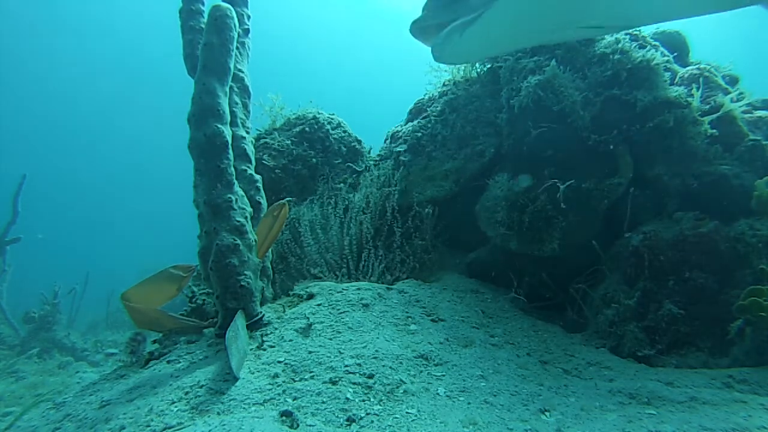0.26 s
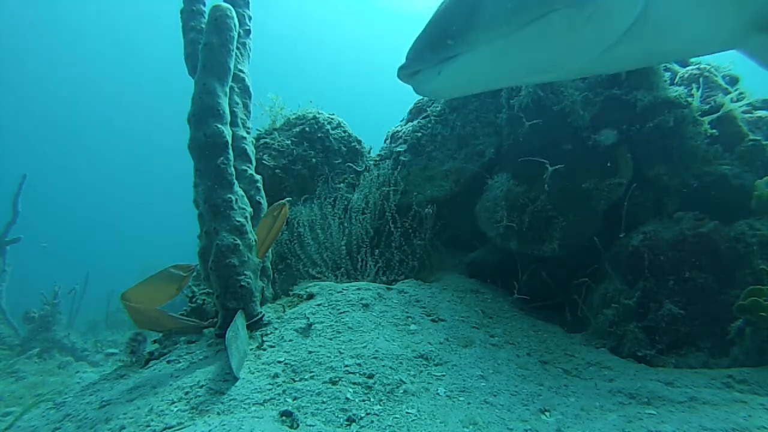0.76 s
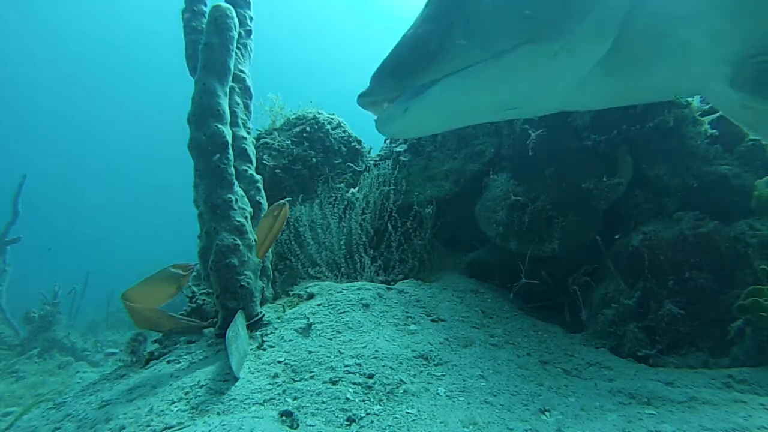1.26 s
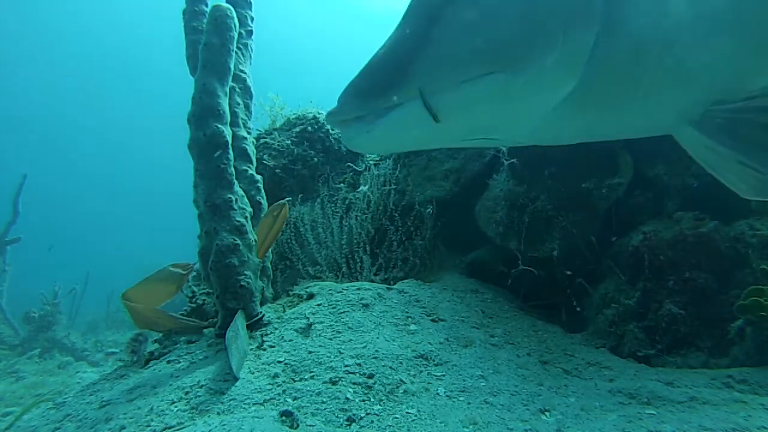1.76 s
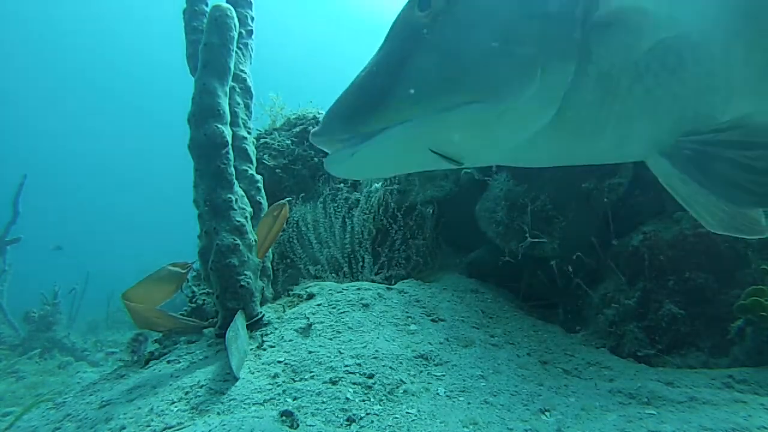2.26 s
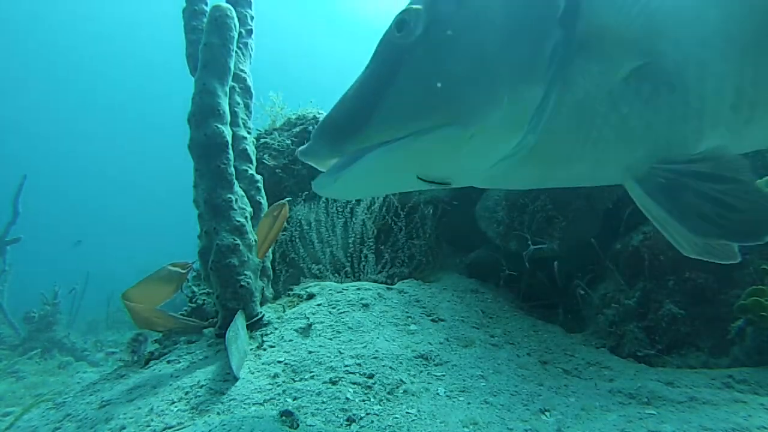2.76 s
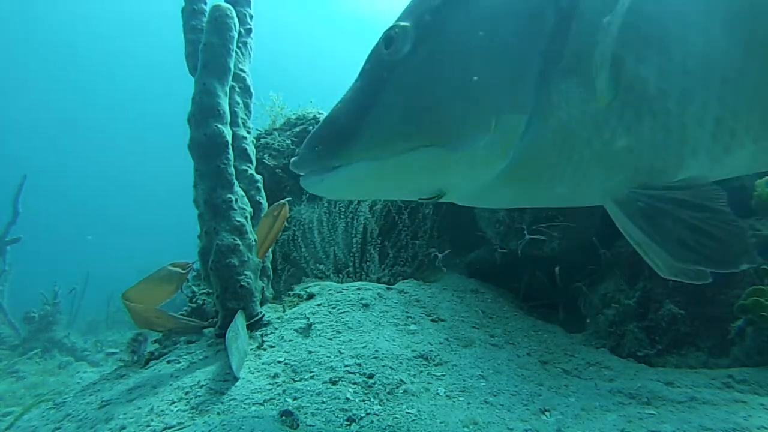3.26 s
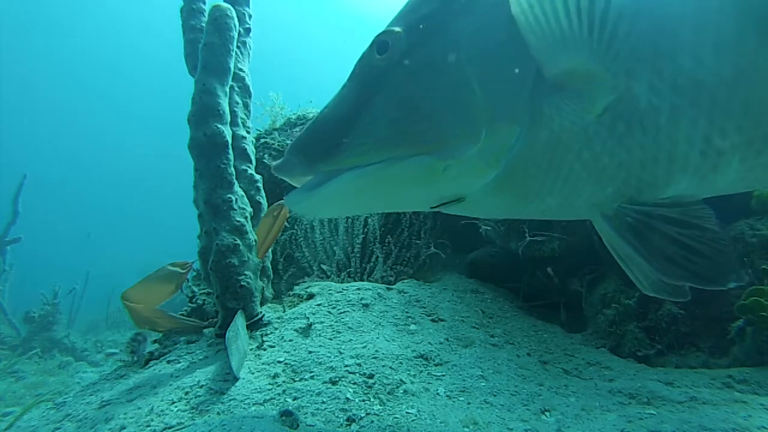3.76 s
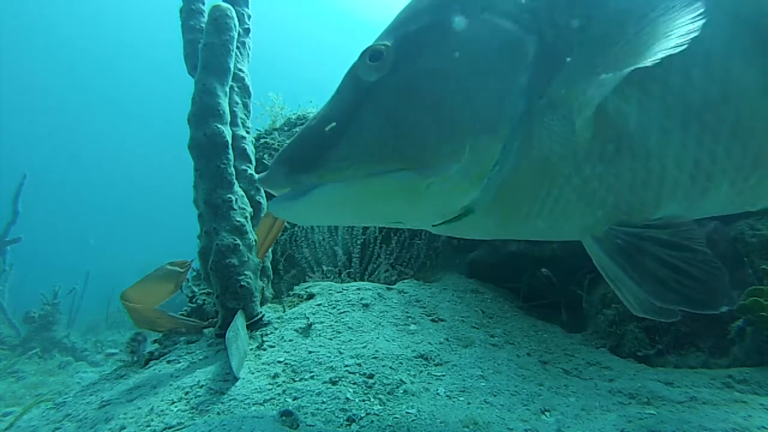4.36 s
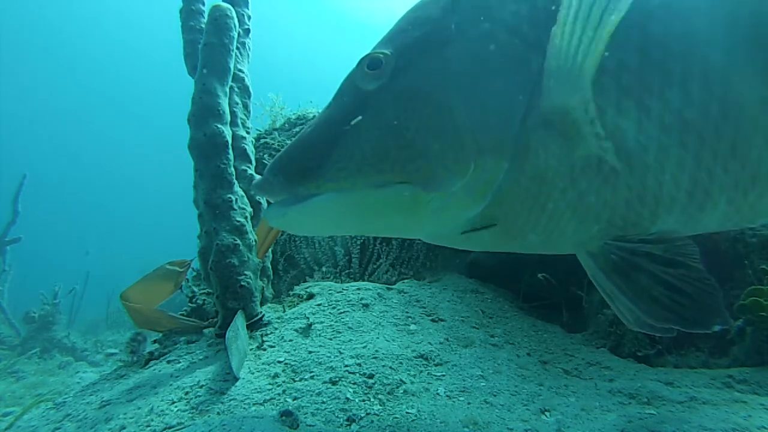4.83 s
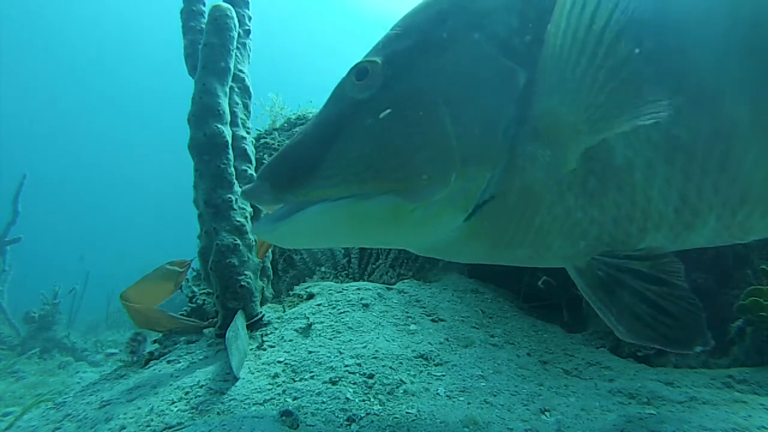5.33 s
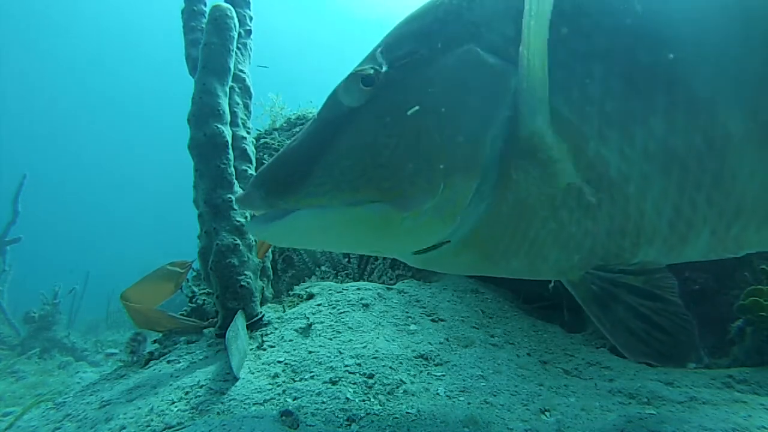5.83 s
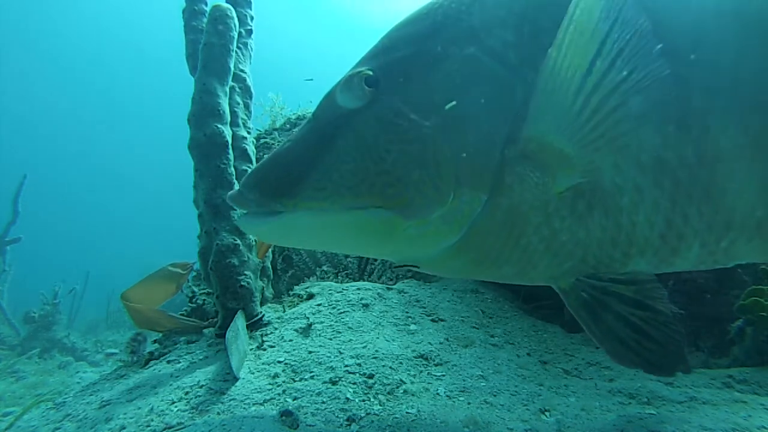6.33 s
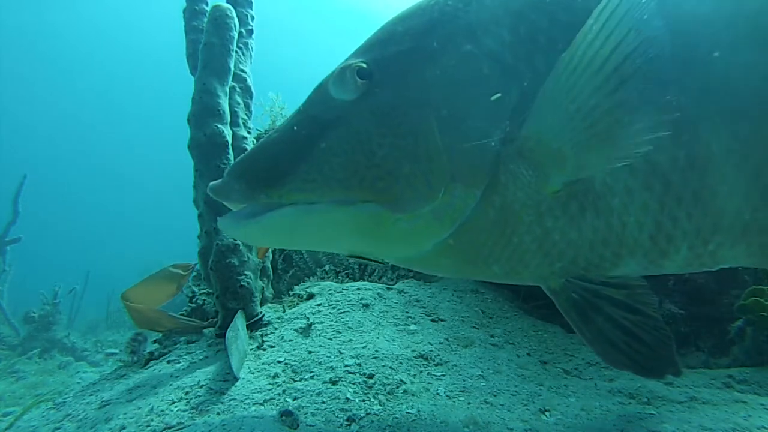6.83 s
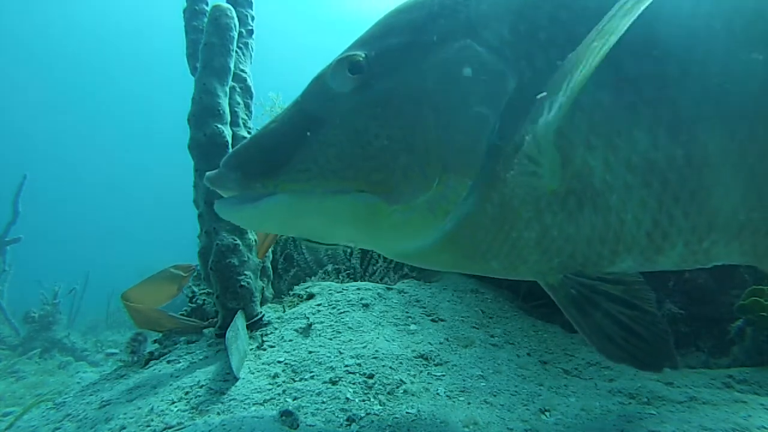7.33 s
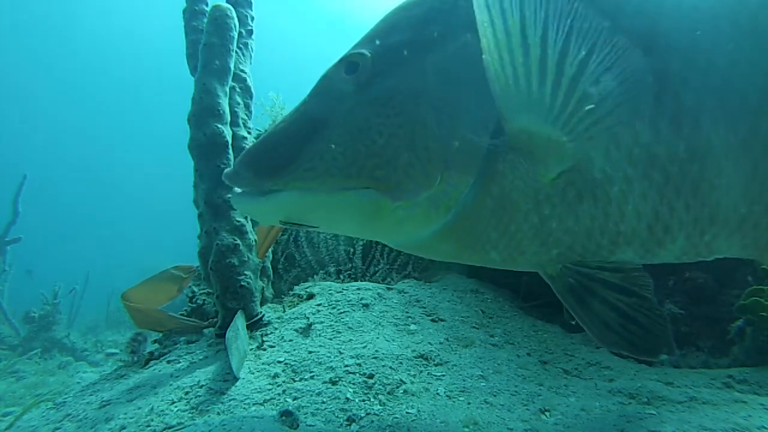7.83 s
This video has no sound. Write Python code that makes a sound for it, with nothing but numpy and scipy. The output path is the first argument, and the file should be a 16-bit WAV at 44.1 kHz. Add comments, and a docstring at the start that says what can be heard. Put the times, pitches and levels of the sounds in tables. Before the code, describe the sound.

A steady underwater crackle, like frying or crackling twigs, made of countless shrimp snaps, dull tocks to thin bright ticks, with brief reef echoes. Low sea wash and soft hiss lie beneath. An early sharp crack dominates; faint low hums rise around it. Later come small dull knocks, stronger snaps and short, faint rising toots. The sound is nearly centred, coloured by the ringing housing of the microphone.

```python
"""Inside a watertight housing on a coral reef: low sea wash, swelling rumble and hiss, all shaped noise, run throughout
under crackling snapping shrimp; every snap is a sum of decaying housing modes. Near and neighbouring snaps have a reef
echo, weaker for the closest; near ones stand out from the start, one very close at 1.0 s. Faint rising fish hums,
harmonic tones, come at 0.9-2.2 s, dull knocks, decaying sines, at 4.3 s and 6.6-6.7 s, and short fish toots, made
like the hums, from 7.2 s."""
import sys
import numpy as np
from scipy import signal
from scipy.fft import rfft, irfft, next_fast_len
from scipy.io import wavfile
from scipy.ndimage import map_coordinates

SR = 44100
rng = np.random.default_rng(int(sys.argv[2]) if len(sys.argv) > 2 else 0)


def store_wav(level_fs):
    """Save 16-bit WAV to argv[1]."""
    pcm = np.round(np.clip(np.atleast_2d(level_fs), -1, 1) * 32767)
    wavfile.write(sys.argv[1], SR, pcm.T.astype(np.int16))


N = 356769


def amp(db):
    """Level in dB to amplitude."""
    return 10 ** (np.asarray(db) / 20)


def unit(x):
    """Scale to rms 1."""
    return x / np.sqrt(np.mean(x ** 2) + 1e-20)


def along(points, hz):
    """Interpolate (frequency [Hz], value) points on a log frequency axis."""
    point_hz, value = np.transpose(points)
    return np.interp(np.log(hz + 1), np.log(point_hz + 1), value)


def wobble(knots_per_s, size):
    """Smooth random curve: a spline through normal random knots."""
    knots = rng.standard_normal(int(size * knots_per_s / SR) + 4)
    return map_coordinates(knots, [np.arange(size) * knots_per_s / SR])


def filtered(x, response):
    """Multiply the spectrum of x by a response of frequency."""
    size = next_fast_len(N + 8192)
    spectrum = rfft(x, size) * response(np.fft.rfftfreq(size, 1 / SR))
    return irfft(spectrum, size)[..., :N]


def noise(density):
    """Coloured noise of rms 1."""
    white = rng.standard_normal(N)
    return unit(filtered(white, lambda hz: amp(along(density, hz))))


def add(track, start_s, sound):
    """Mix a sound into a track, cut at the track's end."""
    part = track[max(round(start_s * SR), 0):][:len(sound)]
    part += sound[:len(part)]


def sea(wash_db=-57, haze_db=-62, rumble_rest_db=-69, rise_s=0.18, fall_s=0.33):
    """Steady wash, swelling rumble and the flickering hiss of countless far shrimp, each as shaped noise."""
    # noise colours: (frequency [Hz], relative density [dB per Hz])
    wash = [(10, -15), (22, -3), (45, 0.5), (80, -2), (160, -6), (300, -9.5), (500, -11), (900, -16.5),
            (1500, -26), (4000, -60)]
    rumble = [(60, -56), (130, 3), (190, 0), (280, -5), (450, -20), (1000, -61)]
    haze = [(400, -10), (950, 0), (1350, -3), (1570, -1), (1800, -4), (2330, -1.5), (2900, -4.5),
            (3310, -5), (4000, -9.5), (4700, -9), (6000, -9.5), (6950, -10), (9400, -15.5), (12000, -20.5),
            (13500, -21), (15000, -25.5)]
    # rumble swells: (start [s], length [s], level [dB])
    swells = [(.88, 0.77, -60), (1.7, 0.32, -57), (4.47, 0.57, -58)]
    t = np.arange(N) / SR
    swell = np.zeros(N)
    for start_s, length_s, db in swells:
        rise = (t - start_s) / rise_s
        fall = (start_s + length_s - t) / fall_s
        swell += amp(db) * np.clip(np.minimum(rise, fall), 0, 1)
    rumble_level = np.maximum(swell, amp(rumble_rest_db))
    haze_level = amp(haze_db + 0.71 * wobble(5.4, N) + 1.35 * wobble(250, N))
    return amp(wash_db) * noise(wash) + rumble_level * noise(rumble) + haze_level * noise(haze)


def side_noise(level_db=-80):
    """Faint wide noise, for use with opposite sign in left and right."""
    # (frequency [Hz], relative density [dB per Hz])
    side = [(18, -37), (30, -7), (116, -8), (167, -10.5), (364, 2), (1920, 0.5), (2310, -2), (3780, 4.5),
            (8470, -1), (15000, -33)]
    return amp(level_db) * noise(side)


def ring(low_db, treble_db, scatter_db, detune, phase_spread_rad=1.0, attack_s=0.00033, edge_hz=650):
    """One collapsing bubble rings the housing modes; its size and path tilt the spectrum and shift the peaks."""
    # housing modes: (frequency [Hz], bandwidth [Hz], relative spectral peak before tilt [dB])
    housing = [(998, 144.5, -11), (1562, 84, -8), (2368, 297, 1), (3320, 200, -2), (3544, 210, -15.5),
               (4630, 350, -8), (5670, 220, -15), (6930, 580, -8.5), (8200, 580, -19.5), (11020, 1080, -21),
               (12570, 910, -28), (14400, 1040, -38)]
    t = np.arange(SR // 50) / SR
    hz, width_hz, db = np.transpose(housing)[:, :, None]
    tilt_db = along([(950, 0.97 * low_db), (1550, low_db), (2300, 0.0037), (3400, 0), (7000, treble_db)], hz)
    mode_db = db + tilt_db + scatter_db * rng.standard_normal(hz.shape)
    size = amp(mode_db) * width_hz / width_hz.mean()  # wider modes die sooner
    pitch_hz = hz * (1 + detune * rng.standard_normal(hz.shape))
    phase = phase_spread_rad * rng.standard_normal(hz.shape)  # modes start at loosely scattered phases
    modes = size * np.exp(-np.pi * width_hz * t) * np.cos(2 * np.pi * pitch_hz * t + phase)
    onset = 1 - np.exp(-t / attack_s)
    highpass = signal.butter(3, edge_hz, "high", fs=SR, output="sos")
    return signal.sosfilt(highpass, modes.sum(0) * onset)


def colonies(snaps_per_s=130, base_db=-54, spread_db=5, range_db=15, patches=24):
    """Reef patches from dull to bright, each repeating its own snap at random; few snaps are strong."""
    out = np.zeros(N)
    for treble_db in np.linspace(-6, 20, patches):
        patch_db = base_db - 0.63 * max(treble_db, 0)  # brighter, so less body
        snap = amp(patch_db) * ring(0, treble_db, scatter_db=3, detune=0.036)
        waits, strengths = rng.exponential(size=(2, 128))
        times_s = np.cumsum(waits) * patches / snaps_per_s
        for time_s, strength in zip(times_s, strengths):
            add(out, time_s, snap * amp(min(spread_db * strength, range_db)))
    return out


def reef_echo(surface_s=0.011, surface_db=-20, t60_s=0.046, scatter_db=-10, dull_hz=4500):
    """Inverted copy from the surface plus short coral scatter, new for every place, then dulled together."""
    t = np.arange(SR // 10) / SR
    tail_db = -60 * t / t60_s + 2.03 * wobble(377, len(t))
    onset = 1 - np.exp(-t / 0.0044)
    tail = rng.standard_normal(len(t)) * amp(tail_db) * onset
    echo = amp(scatter_db) * tail / np.linalg.norm(tail)
    add(echo, surface_s * rng.uniform(0.79, 1.8), -amp([surface_db]))
    return signal.lfilter(*signal.butter(1, dull_hz, fs=SR), echo)


def snap_in_reef(db, low_db, treble_db, gain_db=15, dry_above_db=-40, drying=0.62):
    """One snap and its echo; the closer the shrimp, the less the reef colours and echoes it."""
    far = amp(-drying * max(db - dry_above_db, 0))  # 1 when far, towards 0 when close
    snap = amp(db + gain_db) * ring(low_db, treble_db, scatter_db=2.8 * far, detune=0.032 * far)
    sound = far * signal.fftconvolve(snap, reef_echo())
    add(sound, 0, snap)
    return sound


def neighbours(snaps_per_s=10, mean_db=-56, spread_db=0.7, low_spread_db=4):
    """Loose, steady patter of weaker snaps, from dull tocks to thin ticks with less body."""
    dullest_db, brightest_db = -15.5, 16.5  # treble tilt
    body_loss = 0.33  # dB of level lost per dB of brightness
    out = np.zeros(N)
    for k in range(160):
        when, bright = rng.uniform(size=2)
        size, low = rng.standard_normal(2)
        time_s = (k + 2 * when - 1) / snaps_per_s
        treble_db = dullest_db + bright * (brightest_db - dullest_db)
        db = mean_db + spread_db * size - body_loss * max(treble_db, 0)
        if 0 < time_s < N / SR:
            add(out, time_s, snap_in_reef(db, low_spread_db * low, treble_db))
    return out


def near_shrimp():
    """Single bubble snaps that stand out from the crackle."""
    # (time [s], level before the gain of snap_in_reef [dB], low tilt [dB], treble tilt [dB])
    snaps = [(0.046, -53.5, -3, 4.5), (0.4569, -48, 6, -17), (0.5067, -56.5, -3, 10),
             (0.776, -49.5, 6, -14), (0.8556, -50.5, 4, 1), (0.935, -54, 3, 17), (0.948, -53, -8, 10),
             (1.0038, -14, -2, 0.5), (1.2898, -49, 3, -0.5), (1.3588, -44.5, 2.5, -15),
             (1.4677, -50, -2, -1.5), (1.535, -50, 17, -17), (1.54, -43, 13.5, -4), (1.649, -42.5, 6, -10),
             (1.66, -50.5, -1, 10), (1.9631, -48, 2, -6), (2.16, -45.5, 3, 4), (2.2536, -48.5, 6, -18),
             (2.585, -46.5, 0, 1.5), (2.7354, -45.5, 2, -13), (2.786, -48.5, -5, 7.5),
             (3.409, -43, -1, -1.5), (3.454, -40, 2, -14), (3.462, -42.5, -11, 9.5), (3.5456, -43, -5, -14),
             (3.6163, -44.5, 0, -16), (3.811, -48.5, 4, -9), (3.852, -40, -4, -8), (3.934, -41.5, 3, -21.5),
             (3.9948, -43, 7.5, -12), (4.3406, -44, 1, 6), (4.353, -42.5, -2, 4), (4.459, -47, -1, 0),
             (4.524, -43, -4, -2), (4.6169, -51, 9, -18), (4.731, -49, -6, 5), (4.9526, -50, -9, 9.5),
             (5.2543, -46.5, 5, -3), (5.2646, -45, -6, 8.5), (5.6123, -45.5, 5, -7),
             (5.8349, -43, -3.5, -10), (5.843, -35, 1, -10), (5.8843, -53.5, 4, 11),
             (5.9255, -52.5, -11, 19.5), (5.9707, -54, 1, 11), (6.0836, -43.5, 8, -2.5),
             (6.3312, -44.5, 5.5, 0.5), (6.363, -45.5, -3, -6), (6.4938, -41, -3, 2),
             (6.5371, -35.5, 2.5, -5.5), (6.5747, -43.5, 3, -4), (6.6501, -27.5, 6, -40),
             (6.6567, -41, 8, -10), (6.67, -38, -2, 1), (6.821, -38.5, 3, -10), (6.8565, -46, 2, -12),
             (6.9409, -46.5, -3, -19), (6.9605, -44, 2, -2), (6.998, -38.5, -1.5, 0.5),
             (7.1545, -39, -7.5, -6.5), (7.2281, -45.5, 4, 5), (7.7323, -42.5, -1, -6),
             (7.8922, -46, 5, 5.5), (7.897, -38, 0.5, 3.5), (8.0377, -42, 4, -2)]
    out = np.zeros(N)
    for time_s, db, low_db, treble_db in snaps:
        add(out, time_s, snap_in_reef(db, low_db, treble_db))
    return out


def fish(calls, voice, jitter, flutter_db):
    """Muscles drum the swim bladder: each call starts ragged, speeds up and settles on a steady pitch."""
    out = np.zeros(N)
    for start_s, length_s, first_hz, last_hz, db in calls:
        u = np.linspace(0, 1, round(length_s * SR))
        unsettled = (1 - u) ** 2
        glide_hz = last_hz + (first_hz - last_hz) * unsettled
        pitch_hz = glide_hz * (1 + jitter * unsettled * wobble(2 * last_hz, len(u)))
        phase = 2 * np.pi * np.cumsum(pitch_hz) / SR
        tone = np.zeros(len(u))
        for k in range(1, 7):
            tone += amp(along(voice, k * pitch_hz)) * np.sin(k * phase + rng.uniform(0, 2 * np.pi))
        envelope = np.sqrt(4 * u * (1 - u))
        level = amp(db + flutter_db * wobble(last_hz / 2, len(u)))
        add(out, start_s, tone * envelope * level)
    return out


def hums():
    """Long, rising swim-bladder hums."""
    # (start [s], length [s], first pitch before jitter [Hz], last pitch [Hz], level before voice and flutter [dB])
    calls = [(.86, 0.35, 69.4, 106.8, -59.5), (1.24, 0.23, 61.4, 82, -56), (1.75, .43, 72, 98.6, -55.5)]
    # harmonic levels: (frequency [Hz], level [dB])
    voice = [(80, 0), (155, -0.5), (205, -8), (285, -0.5), (350, -13), (450, -20), (600, -10)]
    return fish(calls, voice, jitter=0.042, flutter_db=2.5)


def knocks(attack_s=0.00087):
    """Soft, low taps in the water close by, each a decaying sine."""
    # (time [s], frequency [Hz], level [dB], decay by 60 dB [s])
    taps = [(4.3217, 631.5, -41.5, 0.055), (4.3228, 370, -40, 0.024), (6.6465, 894, -31.5, 0.0278),
            (6.717, 860, -31.5, 0.013), (6.7235, 840, -31, 0.0071)]
    out = np.zeros(N)
    t = np.arange(SR // 16) / SR
    onset = 1 - np.exp(-t / attack_s)
    for time_s, hz, db, t60_s in taps:
        add(out, time_s, amp(db - 60 * t / t60_s) * onset * np.sin(2 * np.pi * hz * t))
    return out


def toots():
    """Short, rising swim-bladder toots."""
    # (start [s], length [s], first pitch before jitter [Hz], last pitch [Hz], level before voice and flutter [dB])
    calls = [(7.205, .045, 215, 240, -61), (7.388, .055, 245, 290, -55.5), (7.6, .066, 240, 293, -54),
             (7.81, .064, 262, 293, -54), (8.01, .078, 282, 294, -55.5)]
    # harmonic levels: (frequency [Hz], level [dB])
    voice = [(290, -2.5), (580, 0.5), (870, -5), (1160, -14.5), (1700, -32)]
    return fish(calls, voice, jitter=0.145, flutter_db=3.5)


def scene():
    """All sounds in the water, equal in left and right, plus faint side noise of opposite sign."""
    shrimp = colonies() + neighbours() + near_shrimp()
    water = sea() + shrimp + hums() + knocks() + toots()
    side = side_noise()
    return np.array([water + side, water - side])


def record(dry, top_hz=15500, fade_hz=600):
    """Camera band limit: a linear fade centred on top_hz."""
    return filtered(dry, lambda hz: np.clip((top_hz - hz) / fade_hz + 0.5, 0, 1))


dry = scene()
out = record(dry)
store_wav(out)
```